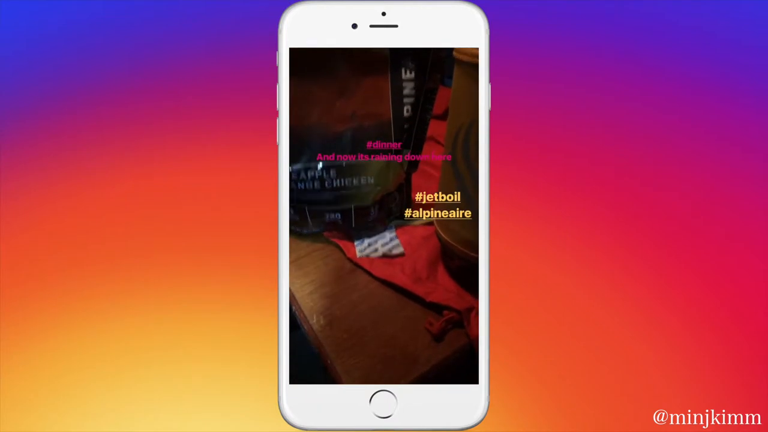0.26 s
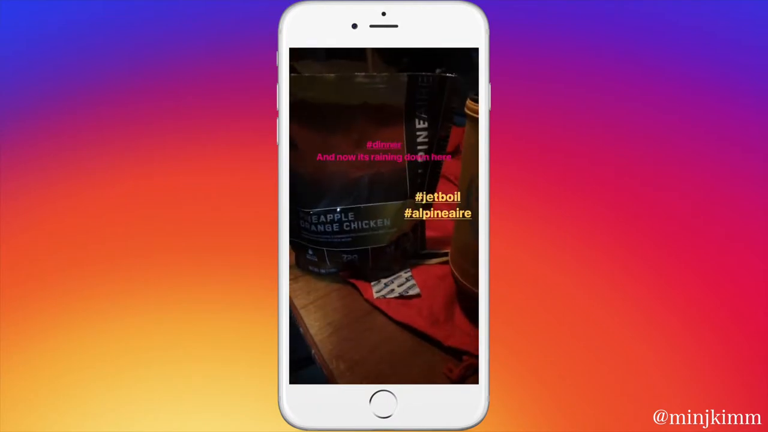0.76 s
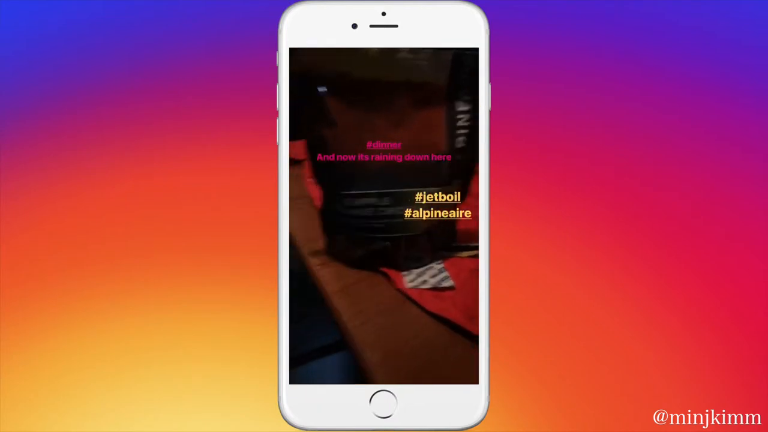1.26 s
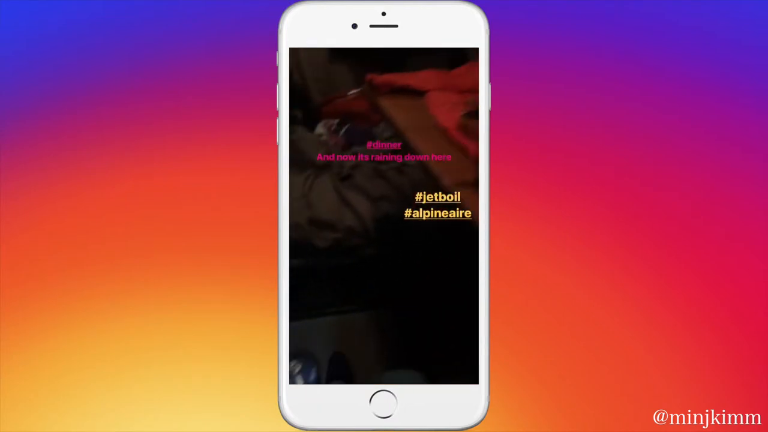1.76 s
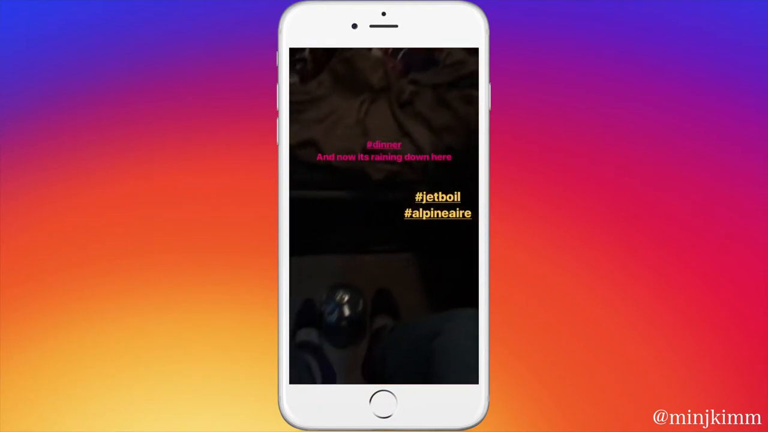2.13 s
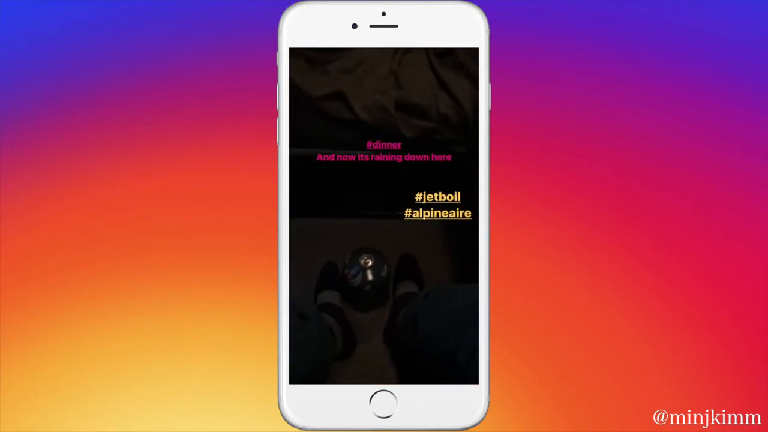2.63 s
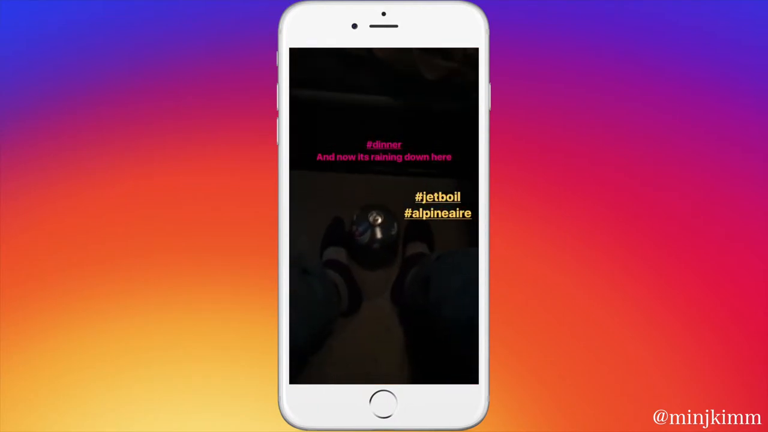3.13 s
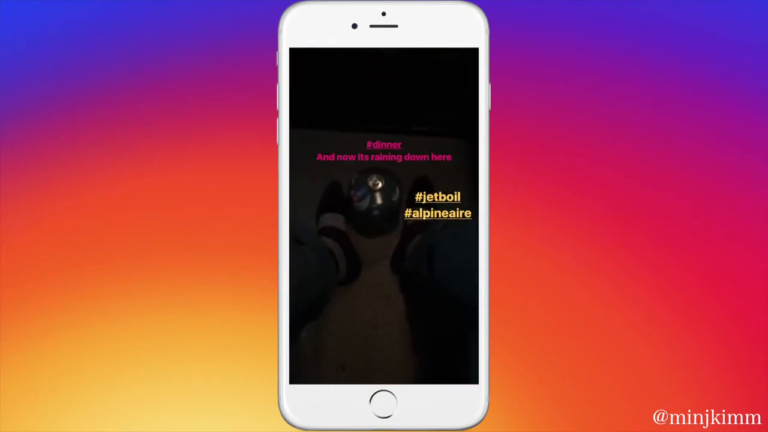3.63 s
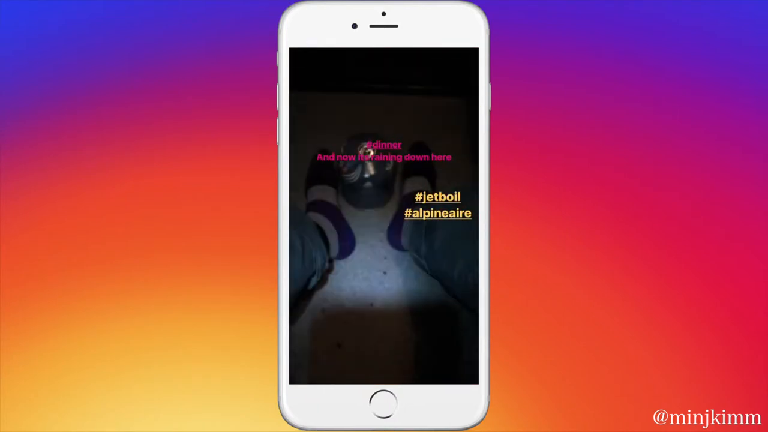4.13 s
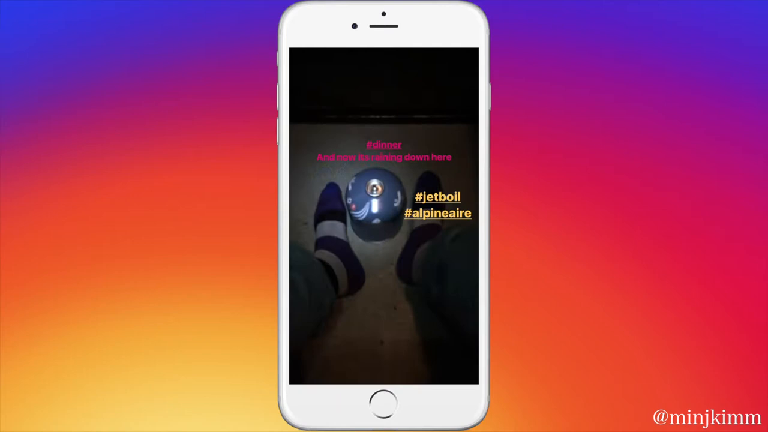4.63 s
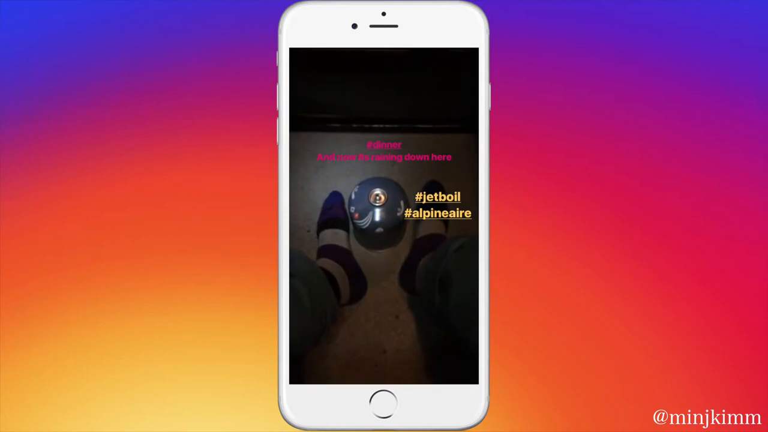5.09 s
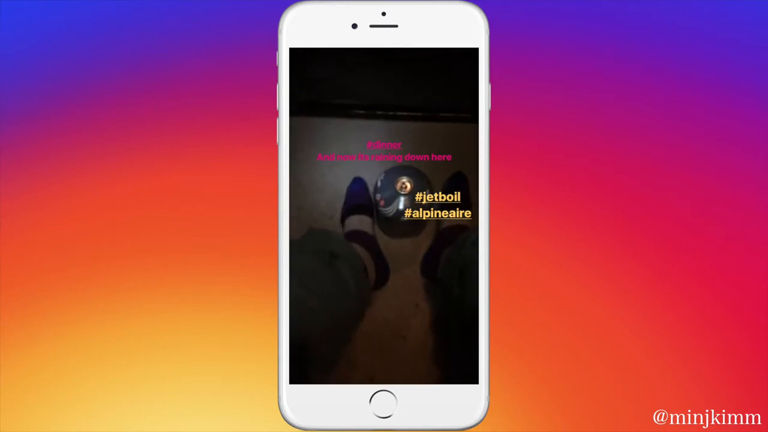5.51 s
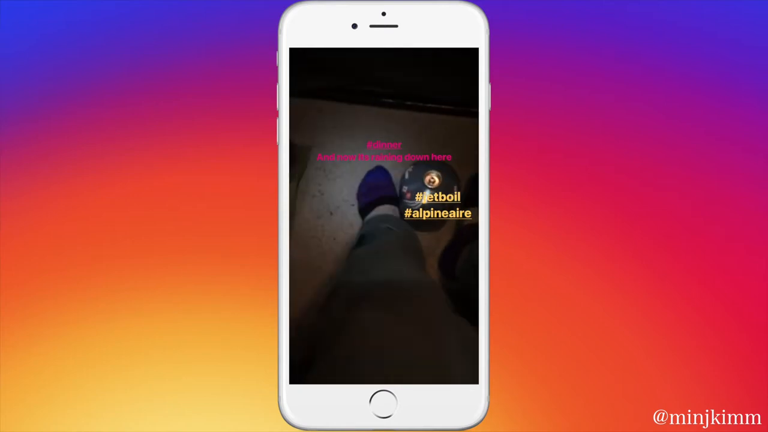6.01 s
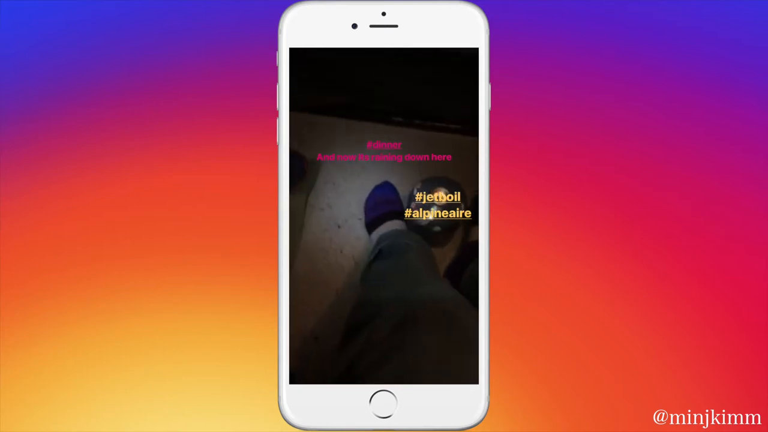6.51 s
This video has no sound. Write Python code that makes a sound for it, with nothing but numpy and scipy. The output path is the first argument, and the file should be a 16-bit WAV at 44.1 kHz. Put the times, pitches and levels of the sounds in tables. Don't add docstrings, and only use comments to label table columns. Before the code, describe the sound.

Heard from inside a small shelter, scattered raindrops tap and thump a thin roof panel, a few much heavier, above a soft, quiet drizzle.

```python
import sys
import numpy as np
from scipy import signal
from scipy.fft import rfft, irfft
from scipy.io import wavfile

SR = 44100
rng = np.random.default_rng(int(sys.argv[2]) if len(sys.argv) > 2 else 0)


def rack_gain(trim_db):
    fader = np.asarray(trim_db, float)
    return 10 ** (fader / 20)


def generate_wav(sig):
    pcm = np.round(np.clip(np.atleast_2d(sig).T, -1, 1) * 32767).astype(np.int16)
    wavfile.write(sys.argv[1], SR, pcm)


N = 297675
RING = SR // 5
BOOM_TOP_HZ, MID_TOP_HZ = 420, 1300
CONTACT_LEAD_S = 0.0008

# frequency in Hz, density in dB per Hz.
SPLASH_SPECTRUM = [(1470, -40), (2500, -2.5), (2890, -8), (4410, -9), (5830, -9.5), (6380, -9.5),
                   (13000, -16.5), (15200, -14)]


def rms_one(x):
    return x / np.sqrt(np.mean(x ** 2, axis=-1, keepdims=True) + 1e-20)


def at_hz(points, hz):
    point_hz, value = np.transpose(points)
    return np.interp(np.log(hz), np.log(point_hz), value)


def coloured(spectrum, shape):
    hz = np.maximum(np.fft.rfftfreq(shape[-1], 1 / SR), 1)
    white = rfft(rng.standard_normal(shape))
    return rms_one(irfft(white * rack_gain(at_hz(spectrum, hz)), shape[-1]))


def on_time_line(s, sounds):
    out = np.zeros(N)
    for at, sound in zip((np.asarray(s) * SR).astype(int), sounds):
        out[at:at + RING] += sound[:N - at]
    return out


def roof_modes(count):
    # frequency in Hz, density in dB per Hz.
    roof_response = [(24, -45), (40, -14), (64, -6.5), (128, 0), (237, -7), (283, -6.5), (345, -4.5),
                     (404, -5), (455, -13), (890, -10.5), (2250, -27), (2490, -29.5), (2690, -29.5),
                     (3920, -38), (4500, -33), (5850, -68), (9900, -120)]
    # frequency in Hz, time to fall 60 dB in s.
    roof_t60 = [(60, 0.35), (250, 0.28), (600, 0.18), (1500, 0.14), (4000, 0.099)]
    # frequency in Hz, level in dB (only the frequency is used).
    lively_modes = [(75, -63), (232, -59), (290.7, -61), (469, -62), (1130, -69), (1561, -74), (1723, -72),
                    (2035, -74), (2116, -78), (2272, -76), (2439, -78), (2810, -79), (2896, -80),
                    (3257, -84)]
    t = np.arange(RING) / SR
    place = (np.arange(count) + rng.random(count)) / count
    hz = np.r_[45 + 4200 * place ** 1.5, np.array(lively_modes)[:, 0]]
    height = rack_gain(at_hz(roof_response, hz)) * hz ** (1 / 6)
    height[count:] *= rack_gain(1.0)
    fade = rack_gain(-60 * t / at_hz(roof_t60, hz)[:, None])
    build_up = 1 - np.exp(-t * hz[:, None] * 1.58)
    return hz, height, np.sin(2 * np.pi * hz[:, None] * t) * fade * build_up


def around(modes, pitch_hz, octaves, depth_db):
    hz, height, rings = modes
    distance = np.log2(hz / pitch_hz) / octaves
    return hz, height * rack_gain(-depth_db * (1 - np.exp(-distance ** 2))), rings


def strike(modes, chosen, where, scatter_db):
    hz, height, rings = modes
    strength = height * np.sign(where) * rack_gain(scatter_db * np.minimum(np.abs(where), 2.5))
    sound = strength[:, chosen] @ rings[chosen]
    return sound / np.sqrt(np.mean(sound[:, :512] ** 2, axis=1, keepdims=True))


def sustain(ring_s):
    t = np.arange(RING) / SR
    length = np.clip(ring_s, .04, .5) / .12
    choke_db = np.minimum((t / length / 0.06) ** 3 * 9, 200)
    return rack_gain(-500 * t * (1 / length - 1) - choke_db)


def drop_rows():
    # start in s, ring level in dB, loudest pitch in Hz, splash in dB relative to ring.
    taps = [(.083,-46.5,980,-25),(.109,-39,496,-56),(.263,-43,486,-22),(.364,-66.5,598,4),(.4,-46.5,700,-21.5),(.778,-44.5,810,-31),(.816,-49.5,452,-16.5),(.969,-42,506,-16.5),(1.053,-43.5,660,-47),(1.209,-42,446,-22),(1.882,-43,740,-25),(1.929,-31,433,-30),(2.246,-35,458,-24.5),(2.291,-40,890,-35),(2.328,-33,420,-39),(2.573,-33.5,673,-27),(3.057,-30.5,1045,-42),(3.198,-34,700,-24.5),(3.213,-36,750,-30),(3.516,-41.5,876,-35),(3.544,-43.5,970,-11),(4.195,-43.5,479,-25),(4.848,-41,1040,-25),(4.922,-37.5,1110,-16),(5.078,-33.5,627,-30),(5.246,-44,462,-48),(5.338,-50,425,-55),(5.804,-43.5,430,-24),(6.448,-52,680,-21),(6.589,-45.5,665,-19.5)]
    drips = [(.143,-36.5,694,-23.5),(.234,-44,620,-21.5),(.436,-43,613,-35),(.538,-38.5,526,-22.5),(.64,-49,456,-23),(1.429,-33.5,675,-28),(1.564,-46,510,-23),(1.621,-47,440,-44),(2.062,-53,537,-17),(2.179,-36.5,608,-25.5),(2.41,-45.5,603,-24),(2.489,-35,1046,-24.5),(2.66,-36.5,594,-35),(3.017,-41,640,-23.5),(3.103,-45.5,778,-39),(3.365,-38,667,-30),(3.765,-33.5,860,-25.5),(4.018,-50,680,-13),(4.08,-35.5,636,-26.5),(4.168,-47,413,-20),(4.458,-63,805,-7),(4.551,-42,473,-23),(4.662,-39.5,503,-19.5),(4.828,-51,900,-28),(5.056,-50,560,-17),(5.227,-53.5,840,-26),(5.393,-47.5,925,-28),(5.541,-52.5,1180,-17),(6.293,-38.5,713,-27),(6.718,-45,736,-29)]
    splats = [(.479,-58,684,-13),(.515,-44,1094,-22),(.88,-47,485,-23),(.993,-38.5,535,-26),(1.133,-43.5,690,-21),(1.243,-42.5,600,-19.5),(1.296,-36,520,-29.5),(1.64,-53.5,815,-16),(1.907,-44,500,-20),(1.958,-34,750,-24),(1.982,-36,703,-27),(2.701,-47,714,-72),(2.739,-42.5,670,-27),(2.902,-43.5,957,-22),(3.61,-42,1036,-24),(3.896,-45.5,964,-21),(3.944,-40,664,-22),(4.239,-45.5,638,-26),(4.423,-49,630,-25),(4.643,-46.5,530,-31),(4.939,-39.5,1110,-33),(5.111,-47,650,-17),(5.408,-44.5,1000,-20),(5.59,-41,558,-27),(5.653,-45,665,-30),(5.973,-35,606,-28),(6.019,-33,588,-29),(6.224,-44.5,674,-29),(6.267,-39.5,591,-35),(6.501,-39,713,-24.5)]
    fainter_drips = [(.001,-41.5,600,-16),(.03,-49,694,-22),(1.42,-39,950,-29),(1.706,-60,581,-15),(1.812,-52,517,-23),(3.249,-42,1100,-22),(3.287,-38.5,910,-19),(3.451,-55,657,-43),(4.496,-60,565,-7),(5.62,-48.5,800,-13),(5.94,-46.5,656,-22.5),(6.0,-50,900,-12),(6.046,-47,660,-24),(6.103,-46.5,600,-16),(6.204,-54,1100,-15),(6.383,-58,610,-35),(6.698,-51.5,614,-17.5)]
    knocks = [
        (3.261,-31,422,-18),
        (4.3,-24,450,-12),
    ]
    rows = []
    for kind, ring_s, swell_s in [(taps, 0.088, 0), (drips, 0.15, 0), (splats, .175, .0015), (fainter_drips, 0.15, 0)]:
        for s, db, hz, splash_db in kind:
            upper_db = -15 + 0.19 * (splash_db + 24) - 0.38 * (db + 43)
            rows.append((s, db, hz, upper_db, splash_db, ring_s, swell_s))
    for s, db, hz, splash_db in knocks:
        rows.append((s, db, hz, -7.5, splash_db, 0.096, 0))
    return rows


def heavy_drops(modes):
    s, mid_db, pitch_hz, upper_db, splash_db, ring_s, swell_s = np.transpose(drop_rows())[:, :, None]
    t, hz = np.arange(RING) / SR, modes[0]
    where = rng.standard_normal((len(s), len(hz)))
    spot = around(modes, pitch_hz, octaves=0.073, depth_db=12)
    mid = rack_gain(-13.0) * strike(spot, (hz >= BOOM_TOP_HZ) & (hz < MID_TOP_HZ), where, scatter_db=2.0)
    upper = rack_gain(upper_db - 5) * strike(modes, hz >= MID_TOP_HZ, where, scatter_db=5.0)
    spread_s = 0.00025 + 0.0016 * np.clip((-31 - mid_db) / 15, 0, 1)
    swell = 1 - np.exp(-t / (0.73 * spread_s + swell_s))
    spray = rack_gain(-60 * t / 0.12) * (1 - np.exp(-t / spread_s))
    splash = rack_gain(splash_db) * coloured(SPLASH_SPECTRUM, (len(s), RING)) * spray
    sound = ((mid + upper) * swell + splash) * sustain(ring_s)
    return on_time_line(s[:, 0] - CONTACT_LEAD_S, rack_gain(mid_db) * sound)


def push_rows():
    # start in s, boom in dB, pitch in Hz, hold in s.
    round_pushes = [(1.435,-41.5,251,0.039),(1.843,-39,278,0.027),(2.248,-34,250,0.022),(2.267,-44,284,0.016),(2.291,-33,278,0.022),(2.329,-37,275,.016),(2.499,-50,257,0.053),(3.057,-30.5,278,0.02),(3.248,-33,235,0.027),(3.367,-42.5,294,0.043),(3.621,-42.5,254,0.042),(3.793,-46.5,296,.036),(4.2995,-24,300,.028),(4.465,-42,322,0.018),(4.663,-38,300,0.027),(4.85,-41,280,0.019),(4.93,-41.5,305,.031),(4.965,-40,263,0.034),(5.244,-37,284,0.023),(6.309,-41.5,295,.03)]
    # start in s, boom in dB, pitch in Hz, hold in s.
    thuds = [(.002,-44,227,0.028),(1.93,-35,220,0.012),(1.945,-37,280,.022),(2.702,-40,290,0.025),(3.268,-29,335,.01),(3.279,-35,317,.025),(3.949,-43,358,.033),(4.302,-22,233,.022),(4.727,-43,260,0.026),(5.44,-45.5,230,0.034),(5.56,-49.5,199,.025),(5.7,-47,300,0.039),(6.026,-37.5,302,0.023)]
    # start in s, boom in dB, pitch in Hz.
    nudges = [(0.235,-49.5,200),(0.527,-47,256),(.638,-47,200),(0.713,-49,165),(.887,-64,283),(1.135,-58,216),(1.249,-51,175),(1.364,-55,265),(2.074,-51,226),(2.187,-46,293),(2.655,-48,253),(2.894,-43,256),(3.459,-53,260),(4.074,-43.5,336),(4.545,-49,302),(4.997,-39.5,280),(5.406,-41.5,264),(5.804,-51.5,340),(5.853,-60,285),(5.91,-56,250),(5.943,-52,258),(6.156,-58,190),(6.497,-45.5,292),(6.589,-47,280)]
    rows = []
    for kind, deep_db in [(round_pushes, -24.5), (thuds, -12)]:
        for s, db, hz, hold_s in kind:
            rows.append((s, db, hz, deep_db, hold_s))
    for s, db, hz in nudges:
        rows.append((s, db, hz, -18, 0.03))
    return rows


def thumps(modes):
    s, level_db, pitch_hz, deep_db, hold_s = np.transpose(push_rows())[:, :, None]
    t, hz = np.arange(RING) / SR, modes[0]
    where = -.3 - rng.random((len(s), len(hz)))
    spot = around(modes, pitch_hz, octaves=0.31, depth_db=13.5)
    note = strike(spot, hz < 520, where, scatter_db=9.0)
    choke_db = np.minimum(9 * (t / np.clip(hold_s, .004, .1)) ** 3, 200)
    held = (1 - np.exp(-t / 0.0047)) * rack_gain(290 * t - choke_db)
    deep_spot = around(modes, 102, octaves=0.68, depth_db=0.5)
    deep = strike(deep_spot, hz < 190, where, scatter_db=-3.0) * sustain(0.078)
    tail = rack_gain(-15.0) * note * sustain(0.15)
    sound = note * held + tail + rack_gain(deep_db + 4.5) * deep
    return on_time_line(s[:, 0] - CONTACT_LEAD_S, rack_gain(level_db - 6.5) * sound)


def rib():
    # frequency in Hz, level in dB, time to fall 60 dB in s.
    rib_modes = [(464, -35, .12), (622, -40, .11), (964, -40, .08), (1058, -34, .09), (1136, -31, .08),
                 (1280, -33, .08), (1410, -36, .075), (1560, -35, .07), (1652, -37, .07), (1720, -36, .07),
                 (2032, -37, .06), (2275, -39, .07), (2864, -37, .05), (1958, -42, .06)]
    # start in s, level in dB.
    rib_hits = [
        (4.3, 3.0),
        (3.261, -13.0),
    ]
    t = np.arange(RING) / SR
    s, level_db = np.transpose(rib_hits)
    ring = np.zeros(RING)
    for k, (hz, db, t60) in enumerate(rib_modes):
        ring += (-1) ** k * rack_gain(db - 60 * t / t60) * np.sin(2 * np.pi * hz * t)
    return on_time_line(s, rack_gain(level_db)[:, None] * ring * (1 - np.exp(-t / .0006)))


def pops():
    # start in s, level in dB, pitch in Hz.
    dents = [
        (.143, -36, 750),
        (1.9295, -31, 230),
        (2.2475, -35, 300),
        (2.3283, -28, 260),
        (3.2608, -15.5, 225),
        (4.3052, -19, 250),
        (5.9405, -40, 260),
        (6.1555, -44, 130),
    ]
    s, level_db, pitch_hz = np.transpose(dents)[:, :, None]
    turns = pitch_hz * np.arange(RING) / SR
    fade = rack_gain(level_db + 4.0 - 60 * turns / 3.5)
    return on_time_line(s[:, 0], -fade * np.sin(2 * np.pi * turns) * (1 - np.exp(-turns / .12)))


def pings(modes):
    # start in s, level in dB, pitch in Hz.
    high_drops = [(0.1424, -44, 1100), (0.477, -55, 2500), (0.54, -53, 2220), (2.66, -60, 2300),
                  (2.903, -59, 2300), (3.2606, -40.5, 2630), (4.03, -55.5, 1840), (4.3, -32, 2400),
                  (.72, -58, 1900), (1.77, -63.5, 2600), (2.36, -53.5, 1600), (6.03, -62, 2200),
                  (0.972, -71, 2620), (1.131, -51, 2640), (1.1747, -52.5, 1650), (1.4216, -51, 1700),
                  (1.8686, -60, 2440), (2, -56, 2160), (3.261, -42, 1300), (1.9295, -46, 1600),
                  (4.975, -55.5, 2010), (5.0579, -56, 1850), (5.16, -72, 2720), (6.103, -62, 1820)]
    s, level_db, pitch_hz = np.transpose(high_drops)[:, :, None]
    spot = around(modes, pitch_hz, octaves=0.33, depth_db=11.5)
    where = rng.standard_normal((len(s), len(modes[0])))
    sound = strike(spot, modes[0] > 900, where, scatter_db=-1.0)
    ring_s = .15 - .0015 * (level_db + 55)
    return on_time_line(s[:, 0] - CONTACT_LEAD_S, rack_gain(level_db - 6) * sound * sustain(ring_s))


def ticks():
    # start in s, peak level in dB, pitch in Hz.
    contacts = [(0.1436, -50, 1810), (0.3651, -57, 1850), (0.4379, -57, 1530), (0.4783, -53, 2300),
                (0.5212, -50, 1780), (0.6414, -56, 1700), (0.9702, -51, 1560), (0.9951, -51, 1530),
                (1.1323, -48, 2560), (1.2161, -53, 1530), (1.2456, -48, 2000), (1.2885, -51, 1550),
                (1.4292, -48, 1700), (1.918, -45, 1640), (1.933, -44, 1530), (1.9584, -50, 1500),
                (2.1809, -50, 1500), (2.2458, -49, 1700), (2.2887, -55, 1760), (2.3286, -46, 1600),
                (2.366, -54, 1540), (2.4892, -45, 1550), (2.5726, -49, 1500), (2.6618, -55, 1840),
                (2.7417, -53, 1560), (2.8973, -53, 2010), (3.0255, -47, 1810), (3.0555, -49, 1760),
                (3.2031, -46, 1700), (3.26, -30, 1580), (3.4935, -57, 1710), (3.5438, -48, 1700),
                (3.7653, -48, 1510), (3.9, -54, 1640), (4.0277, -54, 1780), (4.0771, -52, 1710),
                (4.2991, -15, 1720), (4.5421, -52, 1690), (4.6448, -54, 1620), (4.6643, -50, 1830),
                (4.9202, -48, 1940), (5.0589, -52, 1680), (5.3901, -53, 1530), (5.7997, -57, 1510),
                (5.9753, -52, 1650), (6.0242, -47, 1500), (6.103, -53, 1610), (6.2711, -52, 1570),
                (6.2936, -51, 1670), (6.4956, -53, 1510)]
    s, level_db, pitch_hz = np.transpose(contacts)[:, :, None]
    t = np.arange(RING) / SR
    octaves_off = rng.uniform(-.3, .3, (len(s), 3)) + [-.3, 0, 1.2]
    pitches = pitch_hz * 2 ** octaves_off
    sound = np.zeros((len(s), RING))
    for k in range(3):
        turns = pitches[:, [k]] * t
        sound += np.sin(2 * np.pi * turns) * rack_gain(-60 * turns / 8.0)
    lag_s = .0015 * np.clip((level_db[:, 0] + 45) / 30, 0, 1)
    return on_time_line(s[:, 0] - .0003 + lag_s, rack_gain(level_db - 6.0) * sound)


def shower(s):
    # time in s, strength in dB, fineness in dB.
    strength_rows = [(0.0, -59, 0), (0.43, -69, 0), (1.4, -58, 0.0038), (1.63, -64, 0), (1.82, -68, 0),
                     (2.39, -56, 0), (2.97, -66, 0), (3.44, -57, 0), (3.74, -65.5, 0), (3.93, -60, 0),
                     (4.23, -55.5, 0), (4.63, -62.5, 0.0042), (5.06, -56.5, 0), (5.22, -67.5, 0),
                     (5.93, -62, 0), (6.15, -56, 0), (6.5, -66.5, 0), (6.75, -61, 0)]
    at_s, strength_db, fineness_db = np.transpose(strength_rows)
    db, fine_db = np.interp(s, at_s, strength_db), np.interp(s, at_s, fineness_db)
    swing = db + 60
    ring_db = -60.5 + 0.5 * swing + fine_db
    spray_db = -76.5 + 0.067 * swing + .4 * fine_db
    return db + 2.5, ring_db, spray_db


def patter(modes, per_s, spread_db):
    count = 700
    s = np.sort(rng.random(count)) * N / SR
    boom_db, ring_db, _ = np.array(shower(s))[:, :, None]
    size = rack_gain(spread_db * np.minimum(rng.exponential(1, (count, 1)), 4))
    where = rng.standard_normal((count, len(modes[0])))
    low = modes[0] < BOOM_TOP_HZ
    boom_spot = around(modes, 257, octaves=0.57, depth_db=6.0)
    boom = rack_gain(boom_db - 11.5) * strike(boom_spot, low, where, scatter_db=3.5)
    ring = rack_gain(ring_db - 10.5) * strike(modes, ~low, where, scatter_db=16.5)
    droplet_size = rack_gain(spread_db * np.minimum(rng.exponential(1, N), 4))
    droplets = (rng.random(N) < per_s / SR) * droplet_size
    spatter = np.sqrt(signal.lfilter([1], [1, -.997], droplets ** 2) + .8 ** 2)
    spray_db = np.minimum(shower(np.arange(N) / SR)[2], -68) + 1.0
    spray = rack_gain(spray_db) * rms_one(spatter * coloured(SPLASH_SPECTRUM, (N,)))
    return on_time_line(s, size * (boom + ring)) + spray


def recorder_floor():
    # frequency in Hz, density in dB per Hz.
    floor_spectrum = [(15, -62), (25, -18), (106, 2.5), (279, 7), (356, -12), (518, 0), (677, 1), (960, -8),
                      (3120, -26.5), (12600, -28), (15200, -19.5)]
    return rack_gain(-66.5) * coloured(floor_spectrum, (N,))


def scene():
    modes = roof_modes(count=170)
    rain = heavy_drops(modes) + thumps(modes) + rib() + pops() + pings(modes) + ticks()
    rain += patter(modes, per_s=260, spread_db=2.0)
    return (rain + recorder_floor())[None]


def low_pass(x):
    return signal.sosfilt(signal.butter(12, 15360, fs=SR, output="sos"), x)


def record(dry):
    bass = signal.butter(4, 52, "high", fs=SR, output="sos")
    top = signal.cheby2(12, 60, 15700, fs=SR, output="sos")
    mix = signal.sosfilt(np.r_[bass, top], dry)
    return low_pass(mix)


dry = scene()
out = record(dry)
generate_wav(out)
```